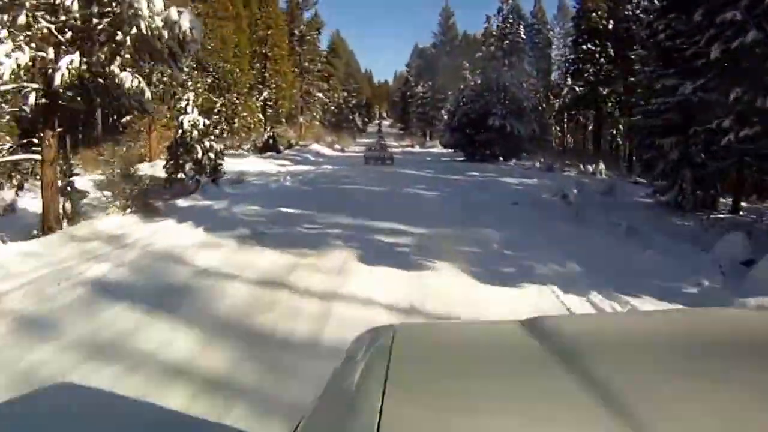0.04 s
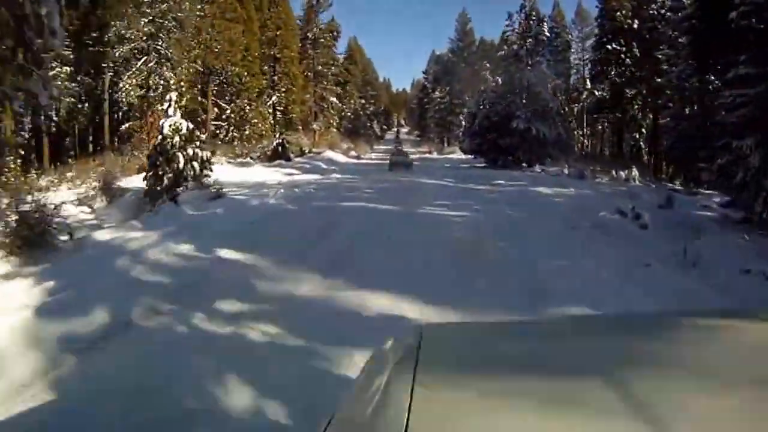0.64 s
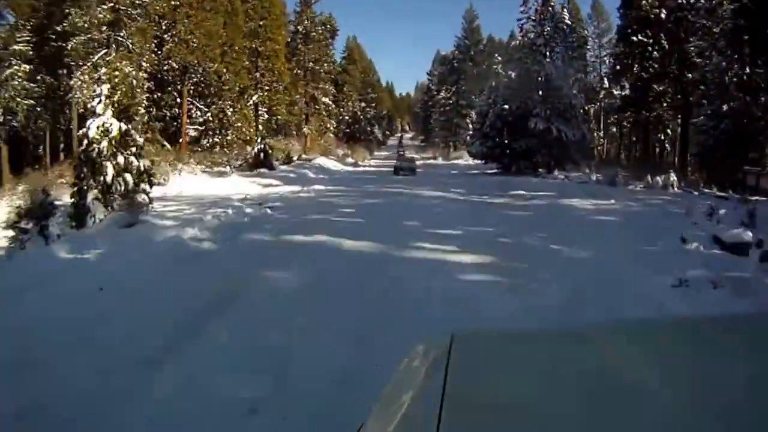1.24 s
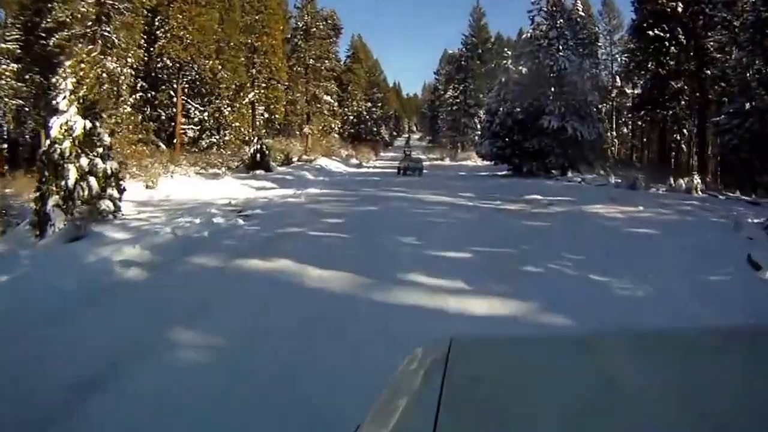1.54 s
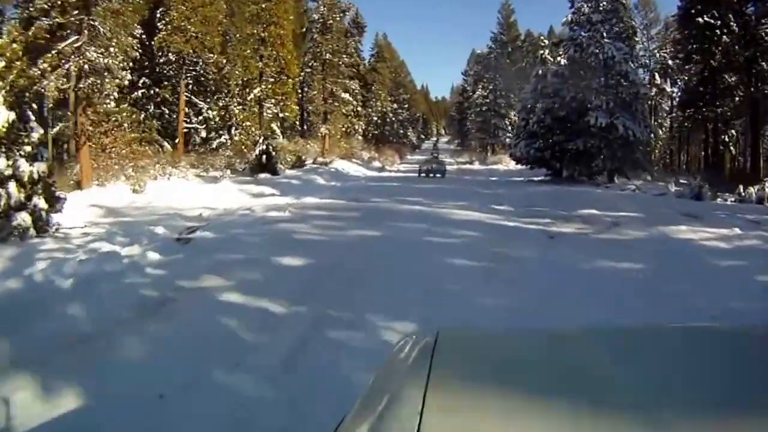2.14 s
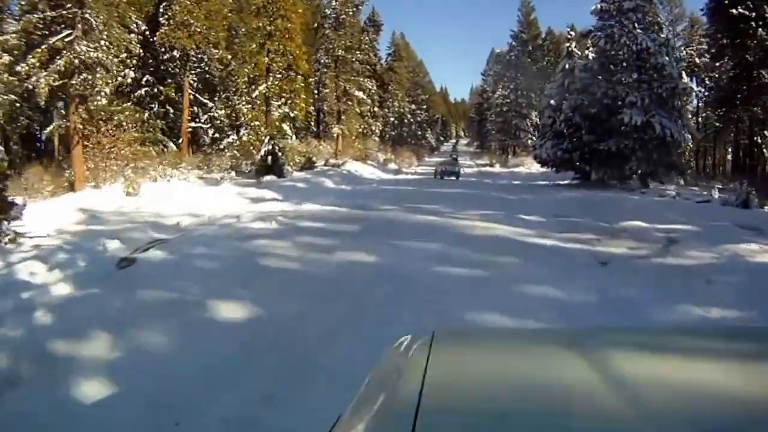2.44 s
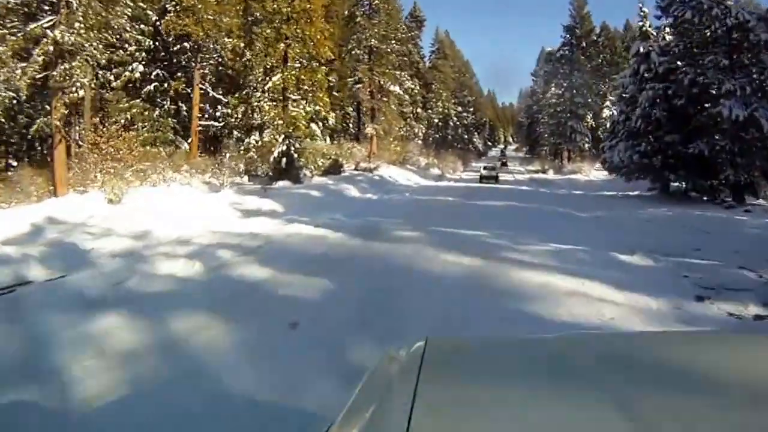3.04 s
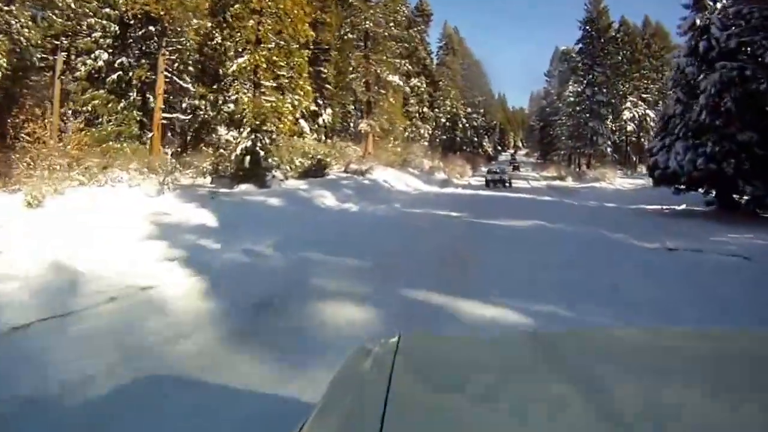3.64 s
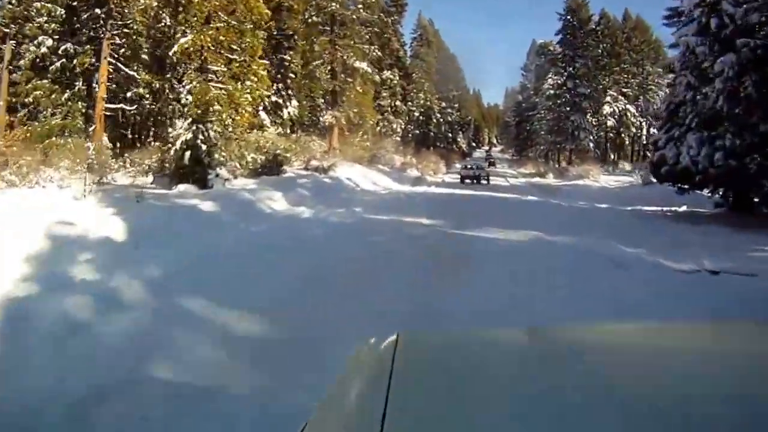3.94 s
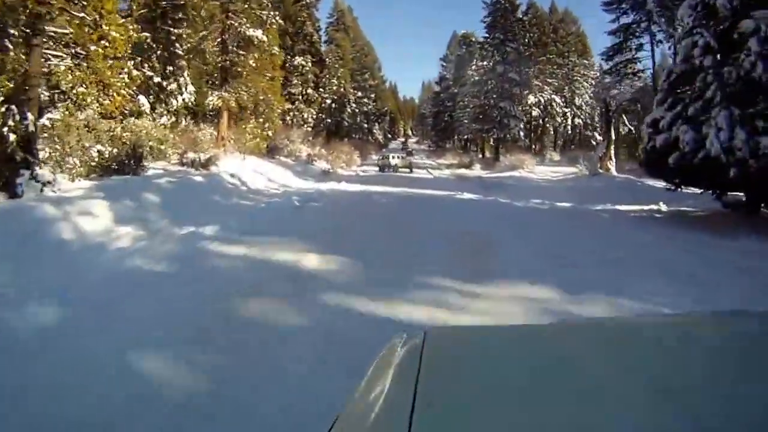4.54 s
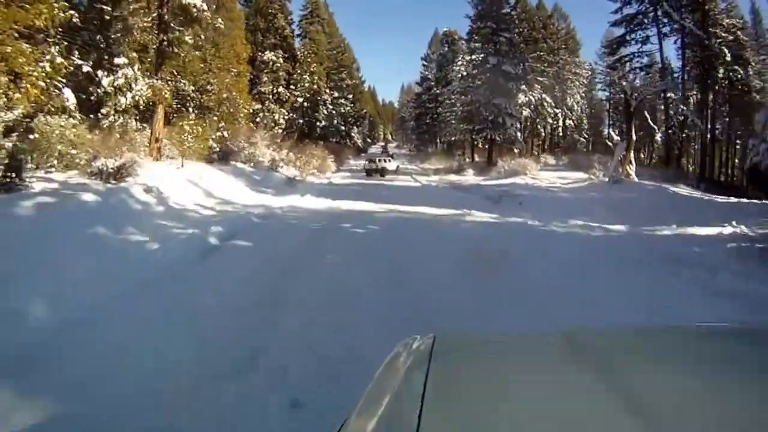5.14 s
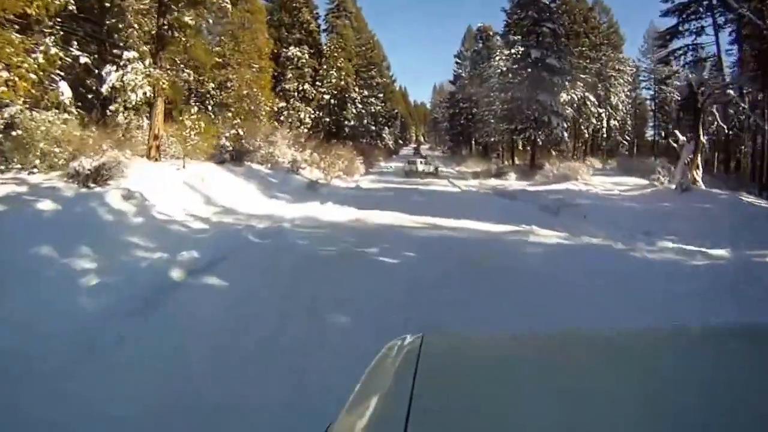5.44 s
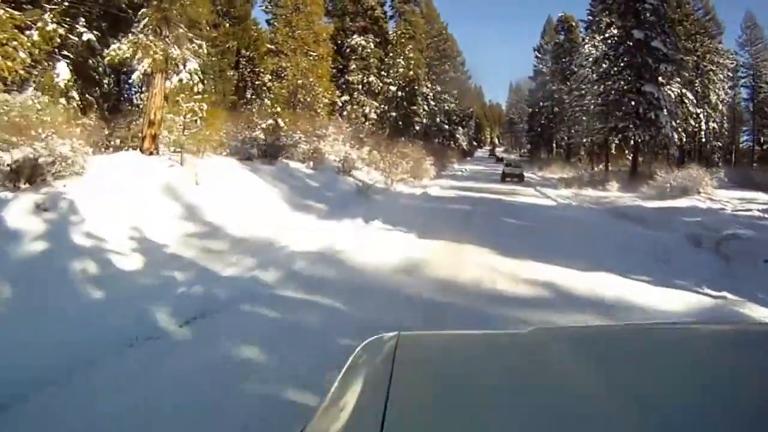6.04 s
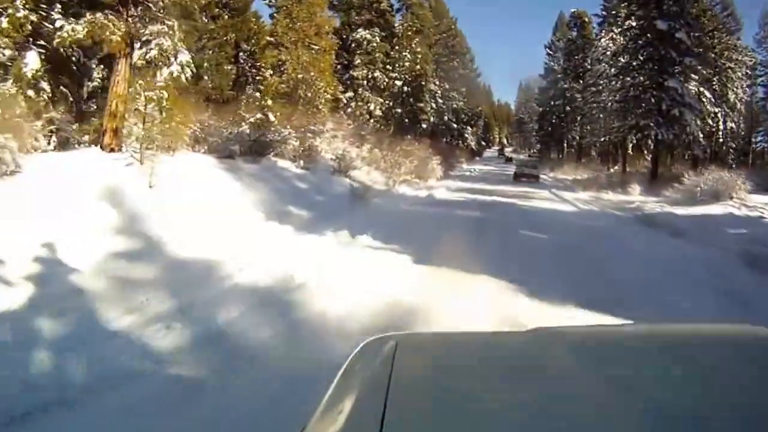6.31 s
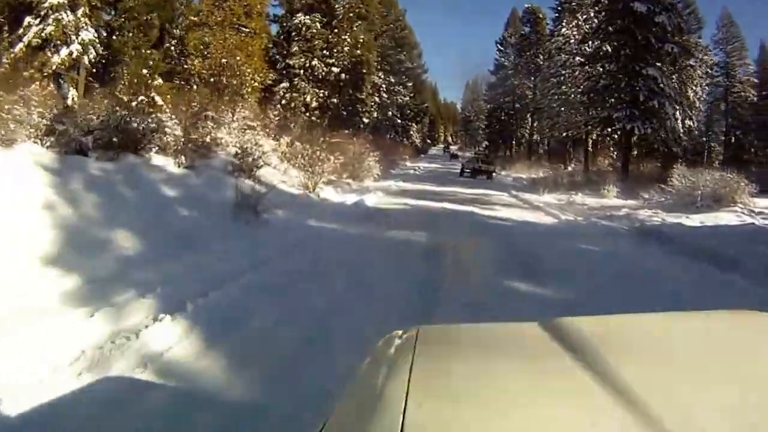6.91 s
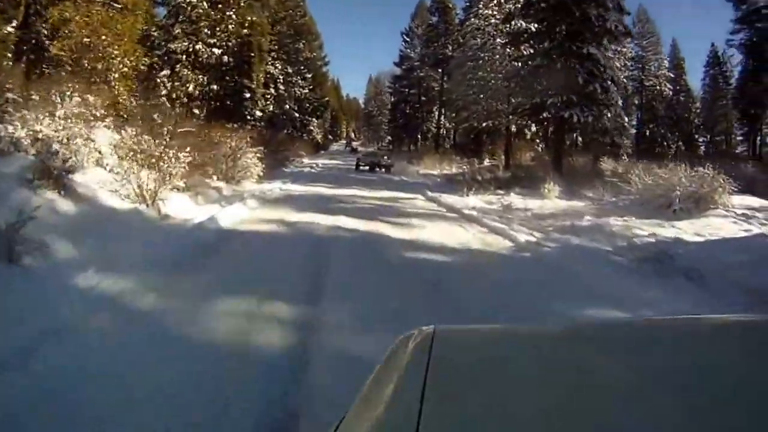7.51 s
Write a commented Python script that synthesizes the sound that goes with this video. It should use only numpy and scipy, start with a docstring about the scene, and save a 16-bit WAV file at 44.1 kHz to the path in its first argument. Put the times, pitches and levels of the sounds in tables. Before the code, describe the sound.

An off-road vehicle drives through snow, heard close from a microphone mounted on its body. From the start, a low engine drone and deep, shuddering rumble sit under the churning and gritty crunching of the tyres. At about 1.7 seconds the engine begins to growl and rise in pitch, peaking near 3.7 seconds, while the crunch and rumble grow louder. Ruts shake the body throughout, with harder bumps around 1.2, 4, 5 and 5.3 seconds and a few short creaks of packed snow. From 4 seconds the revs fall steadily. Between about 4.4 and 5.6 seconds, rubbing snow sets the metal panels ringing lightly. The mount gives irregular dry clicks and brief rasps, sharpest near 4.5 and 6.2 seconds. The vehicle rolls on more quietly until the end, just short of 8 seconds. The treble has a thin, glassy edge.

```python
"""Off-road drive through snow

An off-road vehicle drives along a snowy forest track, heard from a camera mounted on its body.
The engine revs up and eases off. The tyres churn the snow, every rut makes it crunch and the body
shudder, and the mount clicks. The camera holds each coarse sample, which adds a glassy treble."""
import sys
import numpy as np
from scipy import signal
from scipy.fft import rfft, irfft, next_fast_len
from scipy.io import wavfile
from scipy.ndimage import uniform_filter1d, map_coordinates

SR = 44100
rng = np.random.default_rng(int(sys.argv[2]) if len(sys.argv) > 2 else 0)


def put_to_file(sound):
    """Save the sound as 16-bit audio at rate SR, in the file named by the first command-line argument."""
    columns = np.atleast_2d(sound).T  # one column per channel
    safe = np.clip(columns, -1, 1)
    whole_steps = np.round(safe * 32767)
    wavfile.write(sys.argv[1], SR, whole_steps.astype(np.int16))


N = 342657
TIME = np.arange(N) / SR


def amp(db):
    """Turn decibels into a gain to multiply by."""
    return 10 ** (np.asarray(db) / 20)


def unit(x):
    """Scale a sound to an average (rms) size of 1."""
    return x / np.sqrt(np.mean(x ** 2) + 1e-20)


def gain_at(points, hz):
    """Read a gain off a curve of (frequency [Hz], level [dB]) points."""
    freqs, db = np.transpose(points)
    return amp(np.interp(np.log(hz + 1), np.log(freqs + 1), db))


def curve(rows):
    """Join (time [s], value) points with straight lines."""
    return np.interp(TIME, *np.transpose(rows))


def wobble(rate):
    """A smooth random curve through `rate` points a second."""
    points = rng.standard_normal(int(N * rate / SR) + 4)
    return map_coordinates(points, [TIME * rate])


def swells(rows, attack_s, release_s):
    """Gain of (start [s], length [s], level [dB]) events: each rises, holds and fades."""
    power = 0
    for start, length, db in rows:
        rise = np.clip((TIME - start) / attack_s, 0, 1)
        fall = np.clip(1 - (TIME - start - length) / release_s, 0, 1)
        power += (amp(db) * (rise * fall)) ** 2
    return np.sqrt(power)


def filtered(x, response):
    """Turn each frequency up or down by response(hz)."""
    size = next_fast_len(N + SR // 2)
    hz = np.fft.rfftfreq(size, 1 / SR)
    return irfft(rfft(x, size) * response(hz), size)[..., :N]


def noise(tone):
    """Noise shaped by a tone table."""
    return unit(filtered(rng.standard_normal(N), lambda hz: gain_at(tone, hz)))


def steadied(x, seconds):
    """Even out the slow swells of a sound."""
    power = np.abs(uniform_filter1d(x ** 2, int(seconds * SR)))
    return x / np.sqrt(power + 0.00095)


def ring(x, modes):
    """Make a sound ring at each (pitch [Hz], width [Hz], level [dB])."""
    def response(hz):
        return sum(amp(db) * 1j * hz * width / (pitch ** 2 - hz ** 2 + 1j * hz * width)
                   for pitch, width, db in modes)
    return filtered(x, response)


# How hard the tyres work as the vehicle surges and slows: (time [s], pace above a crawl [dB])
PACE_CURVE = [(0, -.5), (1.75, -0.5), (2.4, 2.5), (2.6, 4), (3.1, 6.5), (4.15, 6), (4.6, 4.5), (4.92, 4),
              (5.5, 4.5), (5.85, 1.7), (7, 0), (7.36, -0.5), (7.77, -1)]
def paced(crawl_db, slope):
    """A gain that grows by `slope` dB for each dB of pace."""
    return amp(crawl_db + slope * curve(PACE_CURVE))


# Ruts and crusty patches: (start [s], length [s], shudder level [dB], snow level [dB])
TRACK_RUTS = [(-0.011, 0.3, -33, -44), (0.56, 0.11, -33, -46), (0.673, .15, -20, -43.5),
              (1, 0.03, -24, -43), (1.187, 0.22, -24, -47.5), (1.434, 0.15, -26, -44.5),
              (1.814, 0.12, -32, -41.5), (2.001, 0.39, -25, -42), (2.43, 0.61, -27.5, -46.5),
              (2.988, 0.94, -20, -46.5), (3.995, 0.31, -22.5, -48), (4.48, .26, -21, -40.5),
              (5.06, 0.574, -17.5, -39.5), (5.895, 0.43, -32, -45), (6.393, 0.77, -37, -45),
              (7.127, 0.16, -23, -44.5), (7.431, 0.35, -32, -45.5)]
def ruts():
    """Two gains that jump at each rut; the heavy body answers more slowly than the snow."""
    body = [(start, length, db) for start, length, db, _ in TRACK_RUTS]
    snow = [(start, length, db) for start, length, _, db in TRACK_RUTS]
    return swells(body, attack_s=0.027, release_s=0.056), swells(snow, attack_s=0.014, release_s=0.048)


# Where the camera mount rings: (pitch [Hz], width [Hz], level [dB])
MOUNT_MODES = [(2220, 264, 3), (2520, 430, -2), (3454, 156, 4.5), (4830, 510, -6)]
def through_mount(x):
    """The mount rings along with whatever shakes it."""
    return ring(x, MOUNT_MODES)


# The hardest jolts, before the mount colours them: (time [s], click level [dB], rasp level [dB])
JOLTS = [(.142, -21, -26), (0.708, -20, -16.5), (.7734, -19, -19), (.8031, -16, -28), (1.2074, -23, -20.5),
         (1.4481, -22, -21), (2.446, -16, -18), (2.4987, -13, -30), (2.569, -15, -13.5),
         (2.697, -13.5, -14.5), (2.992, -16, -16), (3.043, -12, -21), (3.2824, -22, -15),
         (3.3544, -27, -22), (3.5408, -14, -16), (3.7817, -17, -18), (4.4792, -5.5, -18),
         (4.569, -11.5, -31), (4.6247, -11.5, -16), (5.084, -18, -16), (5.3503, -25, -20),
         (5.4043, -19, -19.5), (5.549, -17, -23), (6.062, -14, -43), (6.1547, -5.5, -22), (6.2081, -8, -20),
         (6.2881, -20, -28), (6.4462, -20, -17), (6.6784, -26, -27), (6.9943, -27, -32),
         (7.1093, -12.5, -29), (7.1679, -19, -18), (7.2854, -11, -23), (7.456, -13, -22)]
def mount_knocks(click_hz=2750, click_fade_s=0.0022, rasp_fade_s=0.023):
    """Jolts knock the mount against its stop: a dry click and a brief rasp."""
    t = np.arange(SR // 20) / SR
    clicks, rasps = np.zeros((2, N + SR))
    for time, click_db, rasp_db in JOLTS:
        start = int(time * SR)
        span = slice(start, start + len(t))
        pitch = click_hz * np.exp(0.07 * rng.standard_normal())
        clicks[span] += amp(click_db - 60 * t / click_fade_s) * np.sin(2 * np.pi * pitch * t)
        rasps[span] += amp(rasp_db - 60 * t / rasp_fade_s) * rng.standard_normal(len(t))
    return ring(clicks[:N], [(2650, 2900, 0)]) + through_mount(rasps[:N])


# The tone of ringing sheet metal: (frequency [Hz], relative level [dB])
PANEL_TONE = [(500, -49), (950, -15), (1050, -4), (1120, 5.5), (1220, -5), (1350, -0.5), (1480, -8),
              (1650, -7.5), (1900, -29), (3000, -37)]
# Snow rubbing the tyre walls: (start [s], length [s], level [dB])
SNOW_RUBS = [(.47, 0.43, -46.5), (4.35, 1.234, -37.5), (5.65, 0.36, -40.5), (6.1, 0.53, -45.5),
             (6.75, 0.28, -42.5), (7.07, 0.1, -37), (7.53, 0.16, -40.5)]
def panel_ring(flutter_db=2):
    """Snow rubs along the tyre walls and sets the metal panels ringing."""
    rubs = swells(SNOW_RUBS, attack_s=0.046, release_s=0.15)
    level = np.hypot(paced(crawl_db=-44.5, slope=0.92), rubs)  # hypot adds the two powers
    flutter = unit(amp(flutter_db * wobble(40)))
    return flutter * level * noise(PANEL_TONE)


# The tone of the body's deep boom: (frequency [Hz], relative level [dB])
BOOM_TONE = [(12, -19.5), (30, -9.5), (50, -8), (70, -6), (90, -0.5), (128, 2.5), (150, -7.5), (170, -12.5),
             (195, -18.5), (280, -29.5), (400, -44.5), (900, -66.5)]
def body_vibration(sway_hz=26.6):
    """The body sways unevenly at its lowest note, and its panels rumble."""
    drift = 0.75 * wobble(7) + 0.35 * wobble(28)
    size = amp(2.2 * wobble(11) + 1.8 * wobble(35))
    sway = unit(size * np.sin(2 * np.pi * sway_hz * TIME + drift))
    boom = steadied(noise(BOOM_TONE), seconds=0.16)
    return sway, boom


# Hard bumps: (start [s], length [s], level [dB])
BUMPS = [(.22, 0.13, -31), (1.19, 0.057, -23.5), (3.98, 0.13, -20.5), (4.99, 0.034, -19.5),
         (5.31, 0.03, -17), (5.97, 0.267, -40)]
def body_rumble(sway, boom, rut_gain):
    """Ruts shake the body and bumps make it boom; both sounds grow with the pace."""
    bumps = swells(BUMPS, attack_s=0.014, release_s=0.037)
    sway_level = np.hypot(paced(crawl_db=-32.5, slope=1.34), rut_gain)
    boom_level = np.hypot(paced(crawl_db=-28.5, slope=1.1), bumps)
    return sway_level * sway + boom_level * boom


def snow_crunch(shake, rut_gain, crust_strength=0.45, spread_db=6, grit_db=1.5, burst_s=0.0043):
    """Whenever a swing presses the wheels too hard, the crust breaks in a burst of grit."""
    breaks = np.diff((shake > crust_strength).astype(float), prepend=0) > 0
    sizes = breaks * amp(spread_db * np.clip(rng.standard_normal(N), -2, 1.3))
    t = np.arange(SR // 30) / SR
    fade = np.exp(-(t / burst_s) ** 1.5)
    power = signal.fftconvolve(sizes ** 2, fade ** 2)[:N]
    bursts = np.sqrt(np.abs(power)) + amp(-28)  # a little grit between breaks
    grit = bursts * amp(grit_db * wobble(900)) * rng.standard_normal(N)
    level = np.hypot(paced(crawl_db=-54.5, slope=2.6), rut_gain)
    return level * steadied(unit(through_mount(grit)), seconds=0.19)


# The tone of churning snow: (frequency [Hz], relative level [dB])
CHURN_TONE = [(100, -20), (250, -12.5), (340, -6.5), (405, -1), (520, -12), (750, -10.5), (1000, -15.5),
              (1720, -11.5), (1890, 3.5), (2060, 3), (2350, -6), (2900, -11), (3500, -14.5), (4150, -27),
              (5000, -18.5), (6000, -26)]
# Packed snow giving way with a short creak: (time [s], level [dB])
SNOW_CREAKS = [(2.455, -25.5), (3.005, -26.5), (3.35, -34), (3.435, -45), (4.029, -28), (5.54, -30),
               (6.981, -31)]
def tyre_churn(shake, rut_gain, clump_db=2, load_db=1.08, rut_trim_db=-1.5):
    """Snow packs in small clumps under the treads, louder as the body presses down."""
    creaks = swells([(time, 0.011, db) for time, db in SNOW_CREAKS], attack_s=0.015, release_s=0.02)
    rolling = paced(crawl_db=-39.5, slope=0.95)
    level = np.sqrt(rolling ** 2 + (amp(rut_trim_db) * rut_gain) ** 2 + creaks ** 2)
    clumps = unit(amp(clump_db * wobble(130) + load_db * shake))
    return clumps * level * noise(CHURN_TONE)


def engine_tone(phase, db, waver_db=2):
    """One pure tone of the engine, wavering in loudness."""
    return amp(db + waver_db * wobble(16)) * np.sin(phase + rng.uniform(0, 2 * np.pi))


# The tones in the drone: (pitch [times the firing rate], relative level [dB])
EXHAUST_TONES = [(.75, -18.5), (1, 4), (1.25, -14.5), (1.5, -13), (2, -20.5)]
# The drone is loudest near the top of the rev: (time [s], level [dB])
EXHAUST_LEVEL = [(0, -28), (1.7, -37), (2.45, -39), (2.8, -22), (3.3, -25.5), (4.2, -21), (4.7, -23),
                 (5.05, -31), (5.6, -33), (6.15, -29), (6.6, -42.5), (7.77, -31.5)]
def exhaust_drone(phase):
    """The exhaust hums in step with the engine's firing."""
    drone = sum(engine_tone(multiple * phase, db) for multiple, db in EXHAUST_TONES)
    return amp(curve(EXHAUST_LEVEL)) * unit(drone)


# The tones in the growl: (pitch [times the firing rate], relative level [dB])
INTAKE_TONES = [(1.75, -2.5), (2, 3), (2.5, -5.5), (3, 1), (3.5, -7), (4, 0.5), (5, -5), (6, -1)]
# How the engine's air box colours them: (frequency [Hz], boost [dB])
AIRBOX_TONE = [(150, 8.5), (178, 7.5), (205, -3), (235, -1), (280, -11), (330, 3.5), (355, 5), (388, 1),
               (412, 10), (440, 1.5), (465, -0.5), (500, -10), (620, -5.5), (700, -16)]
# One push on the throttle: (start [s], length [s], level [dB])
THROTTLE_PUSH = [(1.7, 1.25, -33.5)]
def intake_growl(phase, firing_hz):
    """With the throttle open, the engine growls through its air box."""
    growl = sum(engine_tone(multiple * phase, db) * gain_at(AIRBOX_TONE, multiple * firing_hz)
                for multiple, db in INTAKE_TONES)
    return swells(THROTTLE_PUSH, attack_s=0.25, release_s=1.44) * unit(growl)


# How fast the engine fires: (time [s], firing rate [Hz])
FIRING_RATE = [(0, 87), (.9, 82), (1.6, 81.8), (1.85, 87.8), (2, 85.3), (2.3, 92.3), (2.75, 104.2),
               (3.2, 113), (3.72, 122), (3.95, 117.3), (4.15, 106.1), (4.5, 105.1), (4.8, 99.6),
               (5.1, 95.8), (5.6, 93.8), (6.3, 86.1), (7, 79.5), (7.77, 73)]
def engine(jitter=0.0039):
    """The slightly uneven firing sets the pitch of both exhaust and intake."""
    firing_hz = curve(FIRING_RATE) * (1 + jitter * wobble(14))
    phase = 2 * np.pi * np.cumsum(firing_hz) / SR
    return exhaust_drone(phase) + intake_growl(phase, firing_hz)


def scene():
    """Add up all the sounds, the same in both channels."""
    body_ruts, snow_ruts = ruts()
    sway, boom = body_vibration()
    shake = unit(sway + 1.3 * boom)  # the changing load on the wheels
    mono = engine() + body_rumble(sway, boom, body_ruts)
    mono += tyre_churn(shake, snow_ruts) + panel_ring()
    mono += snow_crunch(shake, snow_ruts) + mount_knocks()
    return np.array([mono, mono])


def record(dry):
    """The camera holds each coarse sample, which mirrors the sound into a glassy treble."""
    hold_hz, top_hz = 12000, 15600
    treble_cut = [(5500, 0), (6000, -8), (6300, -40), (7000, -100)]  # (frequency [Hz], level [dB])
    band = filtered(dry, lambda hz: gain_at(treble_cut, hz))
    mirrored = band * (1 + 2 * np.cos(2 * np.pi * hold_hz * TIME))
    # Holding softens the highs; everything above top_hz is cut.
    return filtered(mirrored, lambda hz: np.sinc(hz / hold_hz) * (hz < top_hz))


dry = scene()
out = record(dry)
put_to_file(out)
```